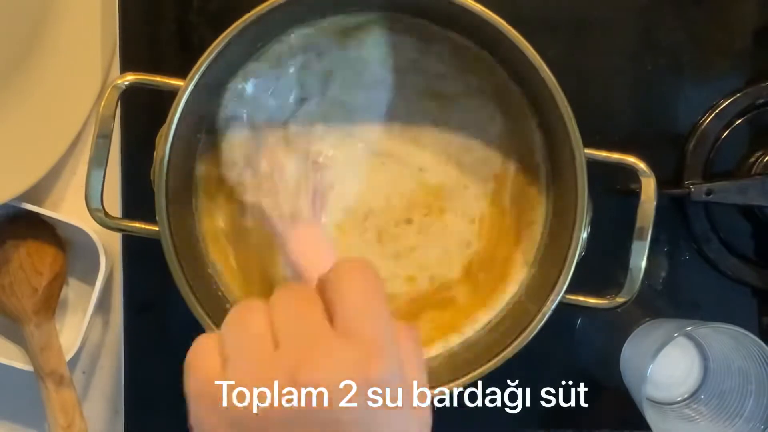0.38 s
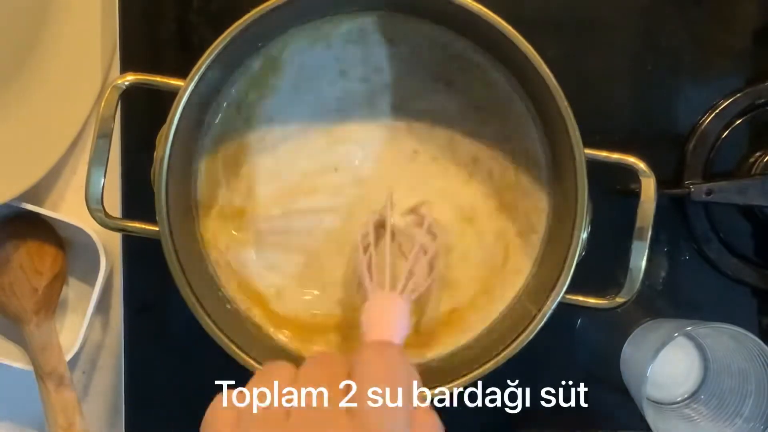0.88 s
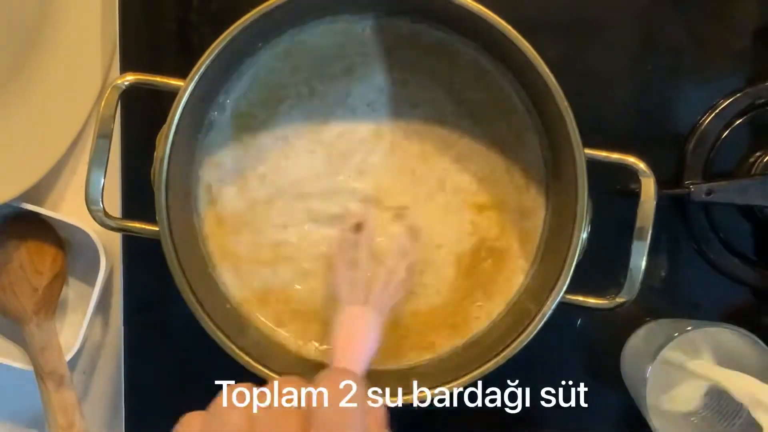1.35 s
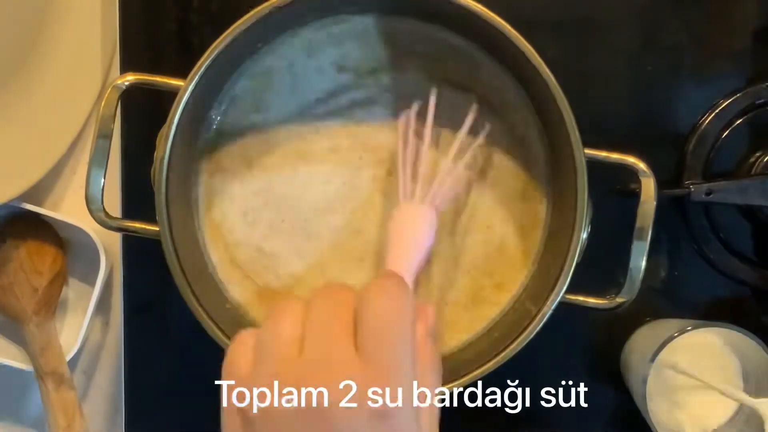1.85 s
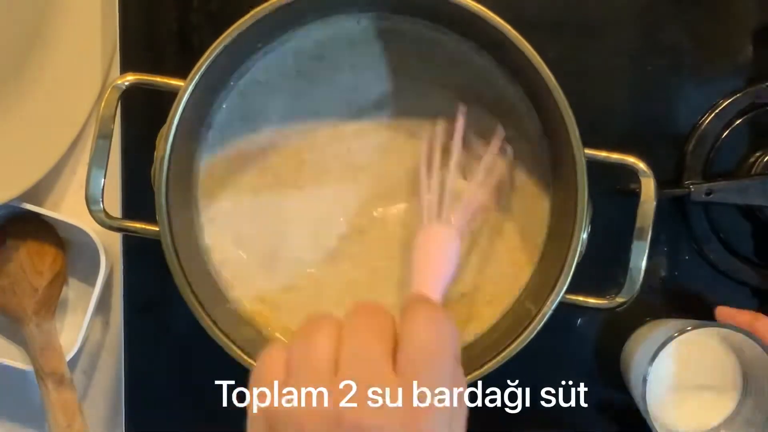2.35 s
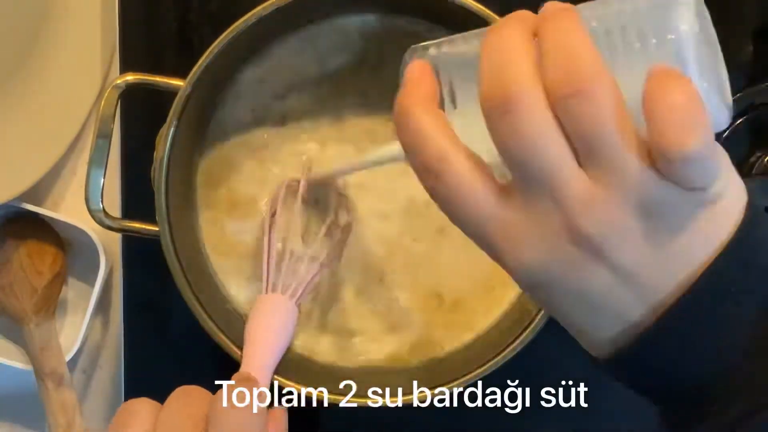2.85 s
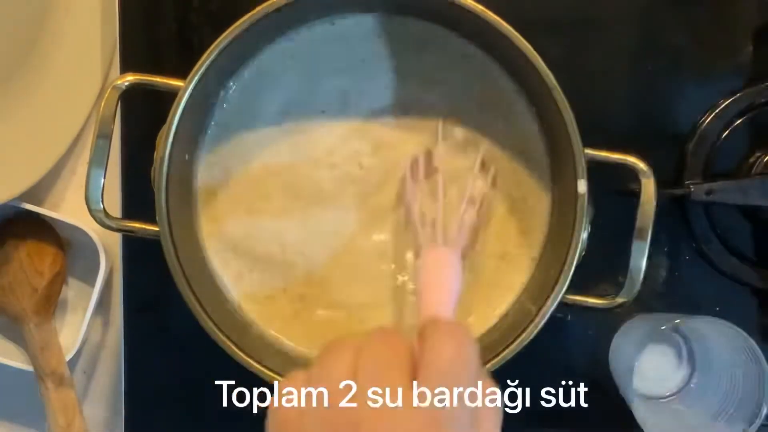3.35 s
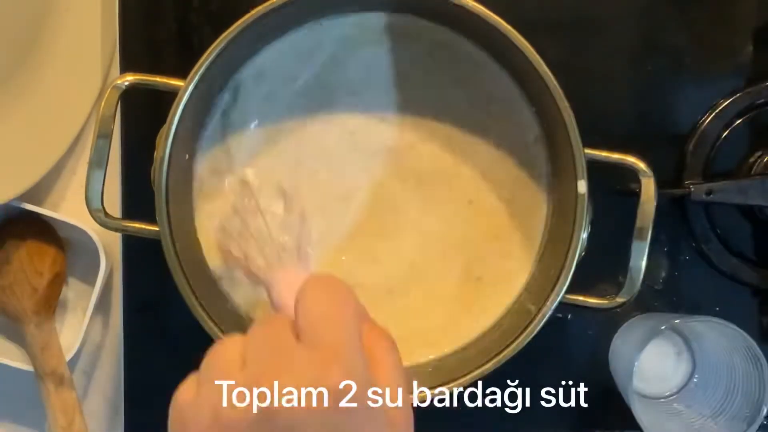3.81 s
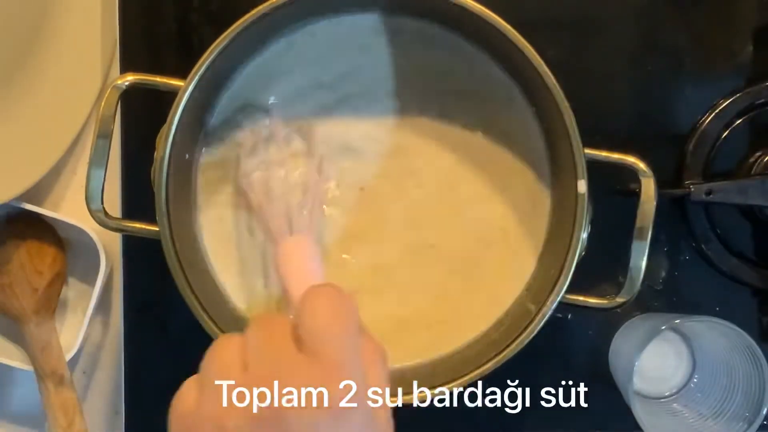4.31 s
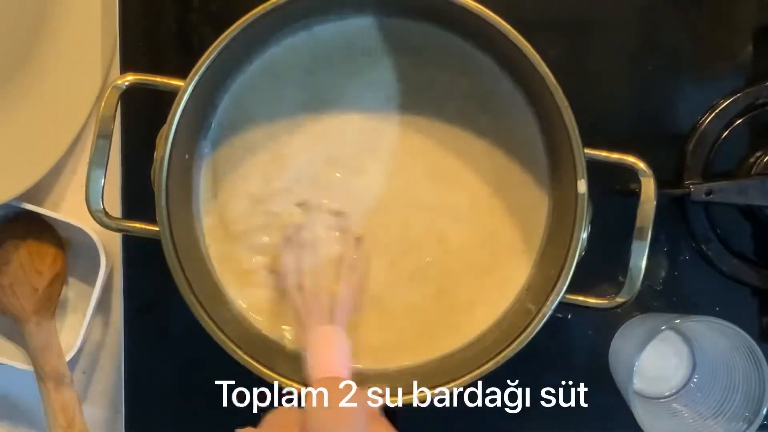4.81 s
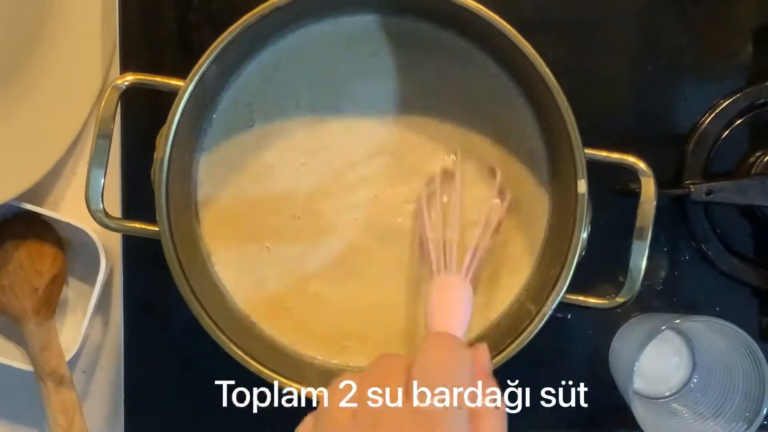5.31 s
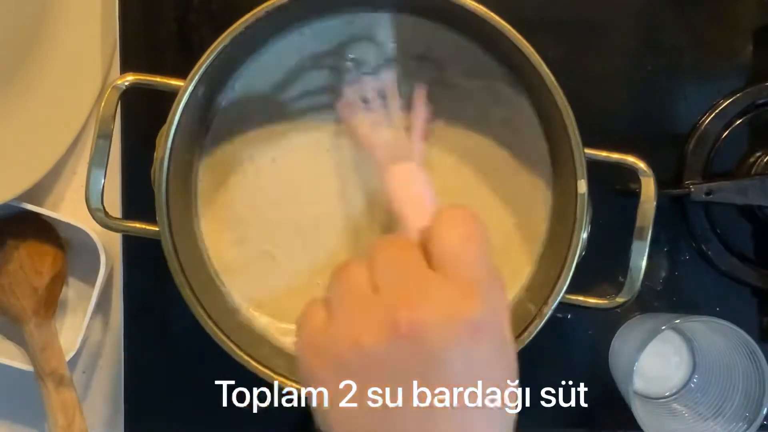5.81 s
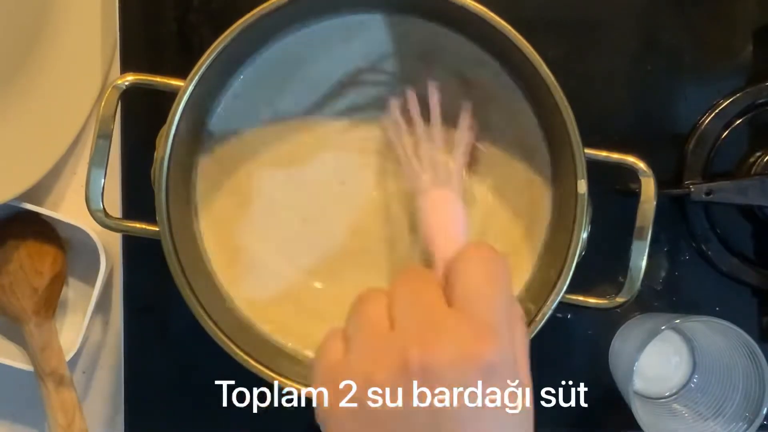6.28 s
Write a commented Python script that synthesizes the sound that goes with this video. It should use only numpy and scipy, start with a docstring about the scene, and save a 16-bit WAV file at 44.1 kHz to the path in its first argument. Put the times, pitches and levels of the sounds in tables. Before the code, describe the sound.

Steady broadband hiss and a mid-pitched fan whine fill the background throughout. In front, wet sauce glugs and plops irregularly as whisk wires brush and tick against steel. Two short bright trickles of milk come before midway; a hard glass click follows the second. Later the pot rings lightly under a few taps and the slosh swells. Close stereo pickup from just above the pot, with little room echo.

```python
"""Throughout, a gas flame hisses (shaped noise) and an extractor fan whines (harmonics of its blade rate),
while stirred sauce plops (damped bubbles) and sloshes (resonant noise) in a steel pot. From the start,
wires rub and knock on steel (noise bursts through modes). Milk trickles (tiny bubbles) at 1.4 s and 2.7 s,
a glass is set down at 3.2 s and taps ring the pot wall from 5.4 s (decaying partials), as the slosh
grows again. Two microphone ports hear it all from just above."""
import sys
import numpy as np
from scipy import signal
from scipy.fft import rfft, irfft, next_fast_len
from scipy.io import wavfile
from scipy.ndimage import uniform_filter1d, map_coordinates

SR = 44100
rng = np.random.default_rng(int(sys.argv[2]) if len(sys.argv) > 2 else 0)


def invert_db(level):
    """Linear amplitude ratio for a level in decibels (20 dB per decade), elementwise."""
    return 10 ** (np.asarray(level, dtype=float) / 20)


def wrap_up_sound(samples):
    """Save the sound to the file named by the first command line argument, as 16-bit audio."""
    columns = np.atleast_2d(samples).T
    # keep every value between -1 and 1, then stretch to whole-number steps
    tamed = np.clip(columns, -1, 1)
    steps = np.round(tamed * 32767).astype(np.int16)
    wavfile.write(sys.argv[1], SR, steps)


N = 283024

# the two ports: f/Hz, left lead/rad, left minus right/dB, likeness of diffuse sound (0-1)
PORT_PAIR = [(100, 0, 0, .985), (200, 0, 0, .9995), (300, .01, .1, .999), (600, .06, 1, .99),
             (1050, .3, 4.5, .9), (1400, .1, 1, .65), (1750, 0, -6, .2), (2100, 1.3, -1, .5),
             (2750, 1.6, -4, .55), (3800, 2.8, -5, .6), (4500, 2.3, -5, .55), (6000, 3.4, -7, .15),
             (6700, 4, -7, .5), (7200, 3.5, -7, .15), (7900, 6.1, -10, .4), (9200, 6.5, -6, .8),
             (11000, 7.7, -2.5, .6), (12400, 9, 0, .8), (16000, 9.6, 1, .75)]


def unit(x):
    """Normalisation: scaled to rms 1."""
    return x / np.sqrt(np.mean(x ** 2) + 1e-20)


def along(points, hz, column=1):
    """Interpolation: one column of a frequency table, read on a log axis."""
    table = np.array(points, float)
    return np.interp(np.log(hz + 1), np.log(table[:, 0] + 1), table[:, column])


def wobble(rate):
    """Band-limited fluctuation: a smooth random curve, rate knots a second."""
    return map_coordinates(rng.standard_normal(int(N * rate / SR) + 4), [np.arange(N) * rate / SR])


def filtered(x, response):
    """Linear filtering: the spectrum of x times a complex response of frequency."""
    m = next_fast_len(x.shape[-1] + 8192)
    return irfft(rfft(x, m) * response(np.fft.rfftfreq(m, 1 / SR)), m)[..., :x.shape[-1]]


def bump(f, hz, octaves):
    """Band weighting: a Gaussian on an octave axis, down to 1/e at octaves from its centre."""
    return np.exp(-(np.log2(f / hz + 1e-9) / octaves) ** 2)


def modes(table, f):
    """Modal superposition: causal response of damped resonators of alternating sign."""
    total = 0
    for k, (centre, width, db) in enumerate(table):
        damping = 1j * f * width
        total = total + (-1) ** k * invert_db(db) * damping / (centre * centre - f * f + damping)
    return total


def spread(pair, directness):
    """Spatial coherence: two unrelated signals mixed to the ports' likeness; near sounds are more alike."""
    def turn(hz):
        likeness = np.clip(along(PORT_PAIR, hz, column=3), .01, 1)
        return np.arccos(likeness ** np.clip(1 - directness, 0, 1)) / 2

    mid, side = filtered(pair, lambda hz: np.array([np.cos(turn(hz)), np.sin(turn(hz))]))
    return np.array([mid + side, mid - side])


def air():
    """Turbulence noise of flame and fan: hiss with soft patches, lifted at resonances of hood and pot."""
    # flame hiss and fan air: f/Hz, relative spectral level/dB per Hz
    hiss_spectrum = [(30, -39), (100, -24), (200, -5), (330, -1.5), (620, -11.5), (850, -24), (1400, -11),
                     (2500, -14.5), (4500, -17.5), (6100, -21), (7100, -13.5), (8700, -18), (9400, -18),
                     (12000, -24), (16000, -42)]
    # resonances of hood and pot: f/Hz, width/Hz, added power/dB
    hood_resonances = [(595.4, 17.3, 14.5), (682.8, 5, 22), (986, 110, 11), (1187, 115, 5.5), (1505, 13, 7),
                       (2126, 40, 9.5), (3033, 20, 9.5), (3534, 71, 8), (3950, 45, 4), (5000, 86, 5.5),
                       (7030, 42, 6.5), (7620, 110, 5.5), (8070, 110, -1), (9200, 120, 6), (9920, 76, -1)]

    def colour(hz):
        power = 1
        for centre, width, db in hood_resonances:
            power = power + invert_db(2 * db) / (1 + (2 * (hz - centre) / width) ** 2)
        return invert_db(along(hiss_spectrum, hz)) * np.sqrt(power)

    z = signal.stft(rng.standard_normal((2, N + 512)), nperseg=512)[2]
    field = uniform_filter1d(rng.standard_normal(z.shape[1:]), size=6, axis=0)
    field = uniform_filter1d(field, size=12, axis=1)
    patchy = z * invert_db(1.55 * unit(field))
    pair = signal.istft(patchy, nperseg=512)[1][:, :N]
    hiss = unit(spread(filtered(pair, colour), directness=0))
    return invert_db(-53 + 0.048 * wobble(3.42)) * hiss


def fan():
    """Blade-passing tones: harmonics of a slightly drifting shaft speed, each wavering in level."""
    # fan whine: order of the blade rate, rms level/dB before wavering
    whine = [(1, -60), (2, -62.5), (3, -65.5)]
    blade_hz = 550.5
    phase = 2 * np.pi * np.cumsum(blade_hz * (1 + 0.001495 * wobble(9))) / SR
    out = np.zeros(N)
    for order, db in whine:
        level = np.sqrt(2) * invert_db(db + 2.05 * wobble(25) + 1.67 * wobble(4.07))
        out += level * np.sin(order * phase + 2 * np.pi * rng.random())
    return out


def blips(rows, damping, rough):
    """Bubble oscillation: short decays whose phase wanders, smearing each note; two unrelated draws."""
    out, t = np.zeros((2, N + SR)), np.arange(SR // 30) / SR
    for s, db, hz, ms in rows:
        steps = rng.standard_normal((2, len(t)))
        drift = rough * np.sqrt(hz / SR / ms) * np.cumsum(steps, axis=1)
        note = np.sin(2 * np.pi * (hz * t + rng.random((2, 1))) + drift)
        swell = (1 - np.exp(-t / 0.00031)) * np.exp(-damping * 1000 * t / ms)
        out[:, round(s * SR):][:, :len(t)] += invert_db(db) * swell * note
    return out[:, :N]


def milk():
    """Entrained-bubble sound: droplets, a fizz of tiny bubbles while milk runs, and a faint flutter."""
    # louder droplets and small bubbles: t/s, relative level/dB, f/Hz
    droplets = [(0.47, -52, 2900), (0.812, -50, 2855), (1.223, -47, 8700), (1.378, -44, 5250),
                (1.398, -49.5, 10000), (1.349, -54, 11800), (1.416, -53, 12900), (1.425, -57, 10600),
                (1.428, -56, 7900), (1.481, -50, 8060), (1.486, -46, 14200), (1.492, -55, 10160),
                (1.539, -48, 5350), (1.58, -48, 14000), (1.59, -50, 10800), (1.592, -50, 7460),
                (1.584, -51, 3350), (1.628, -45.5, 9900), (1.645, -48, 3000), (1.691, -48, 7950),
                (1.691, -45, 2500), (1.698, -44, 2200), (1.697, -50, 7000), (1.726, -52, 10200),
                (1.759, -47, 8850), (1.766, -50, 13500), (1.773, -53, 8000), (1.79, -51, 10000),
                (1.79, -52, 7980), (1.807, -51, 7600), (1.806, -53.5, 2900), (1.841, -50, 10000),
                (2.27, -49, 3510), (2.705, -42, 8700), (2.706, -48, 3230), (2.714, -46, 10950),
                (2.737, -44, 10800), (2.736, -42, 8300), (2.743, -49, 14300), (2.743, -50, 11000),
                (2.744, -54, 4900), (2.765, -51, 11300), (2.769, -48, 13400), (2.788, -53, 7670),
                (2.816, -52, 11900), (2.838, -48, 3300), (2.853, -54, 11000), (2.866, -53, 7750),
                (2.892, -47.5, 4800), (2.893, -48, 3400), (2.901, -47, 12000), (2.901, -45, 14400),
                (3.76, -47, 12500), (6.174, -50, 10700)]
    # milk running, first into the glass, then into the pot: start t/s, end t/s, relative fizz level/dB
    pours = [(1.38, 1.869, -57.5), (2.7, 2.93, -56.5)]
    rise_db_per_s, fall_db_per_s = 250, 500

    when, size, pitch, life = rng.random((4000, 4)).T
    s = when * N / SR
    flows = []
    for start, end, db in pours:
        before, after = np.clip(start - s, 0, None), np.clip(s - end, 0, None)
        flows.append(db - rise_db_per_s * before - fall_db_per_s * after)
    level = np.max(flows, axis=0) - 3.7 * np.log(size + .02)
    tiny = np.transpose([s, level, 2300 * 6 ** pitch, 0.64 + 2.5 * life])[level > -95]
    fizz = blips(tiny, damping=1.54, rough=1.2)

    # life scale is 8.2 ms at 3 kHz, shorter at higher pitch
    rows = [(at, db, hz, 8.2 * (3000 / hz) ** 0.8) for at, db, hz in droplets]
    drops = invert_db(4) * blips(rows, damping=1.1, rough=.8)

    when, size, pitch = rng.random((70, 3)).T
    flutter_db = -57.5 - 3.0 * np.log(size + .05)
    faint = np.transpose([when * N / SR, flutter_db, 3000 * 1.25 ** (pitch - .3), np.full(70, 9.0)])
    flutter = blips(faint, damping=1.3, rough=0.99)
    return spread(drops + fizz + flutter, directness=0.3)


def rubs():
    """Friction and splash noise: short swells of grainy noise, each confined to one band."""
    # wires rubbing the pot and milk splashing: start t/s, length/s, level/dB, centre f/Hz, spread/octaves
    strokes = [(0.025, 0.087, -62, 2900, 0.088), (.13, 0.087, -60, 2900, .1),
               (0.254, 0.024, -50, 2000, 1.3), (.375, 0.037, -58, 2950, .06), (.61, 0.043, -62, 2900, 0.07),
               (.808, .03, -50, 2830, 0.063), (0.838, 0.037, -47, 1140, 0.49), (0.849, .03, -45, 580, 0.41),
               (0.837, .035, -55, 2640, 0.67), (.85, .013, -55, 4700, .06), (0.862, 0.017, -47, 4900, .08),
               (0.872, 0.017, -53, 5200, .07), (0.929, .022, -51, 1050, .5),
               (1.006, 0.0088, -51, 1000, 0.71), (1.465, .006, -54, 4800, .4), (1.476, .03, -56, 8500, 1),
               (1.696, 0.0074, -56, 8500, .4), (1.77, .012, -60, 8500, .3),
               (1.837, 0.0076, -52.5, 3000, .4), (1.536, .032, -52, 5300, 0.32),
               (1.625, .014, -61, 12500, .2), (1.58, .025, -54, 3000, 0.33), (1.638, .025, -53, 2900, 0.3),
               (2.148, 0.016, -48.5, 1200, .7), (2.395, 0.018, -49.5, 1400, 0.42),
               (2.702, 0.038, -53.5, 3050, .12), (2.822, 0.044, -60, 3300, 0.14),
               (2.7, .125, -62, 13500, .4), (2.8, .125, -63, 13000, .4)]
    out = np.zeros((2, N + SR))
    grain = invert_db(3 * wobble(450))  # roughness in dB
    for s, length, db, hz, octaves in strokes:
        u = np.arange(SR // 8) / SR / length
        noise = rng.standard_normal((2, len(u))) * grain[round(s * SR):][:len(u)]
        band = filtered(noise, lambda f: bump(f, hz, octaves))
        band = band / np.sqrt(np.mean(band[:, u < 1] ** 2))
        swell = np.sin(np.pi * np.clip(u, 0, 1) ** 0.82) ** 0.65 * (u < 1)
        out[:, round(s * SR):][:, :len(u)] += invert_db(db) * band * swell
    return spread(out[:, :N], directness=0.24)


def ringing(blows, notes, rise_s):
    """Free vibration: each blow starts every partial afresh, and each dies at its own speed."""
    out, t = np.zeros(N + SR), np.arange(SR // 3) / SR
    for s, db in blows:
        ring = np.zeros(len(t))
        for k, (hz, level, t60) in enumerate(notes):
            ring += invert_db(level - 60 * t / t60) * np.sin(2 * np.pi * hz * t) * (-1) ** k
        out[round(s * SR):][:len(t)] += invert_db(db) * ring * (1 - np.exp(-t / rise_s))
    return out[:N]


def glass_set_down():
    """Impulse response of a glass set down on the hob: quickly damped partials."""
    # the blow: t/s, level/dB
    blow = [(3.2198, -27)]
    # partials: f/Hz, level relative to the blow/dB, t60/s
    glass_notes = [(1240, -1, 0.061), (1460, 0.5, 0.049), (2160, -6.5, 0.036), (2345, -4, .03),
                   (2730, -11, .03), (3300, -10, .04), (3950, -7, 0.056), (5000, -1, .035), (5766, -3, .04),
                   (7284, -6, 0.027), (8870, 4, 0.024), (9600, 10, 0.023), (11300, 2, .03),
                   (13000, -11, .02)]
    return ringing(blow, glass_notes, rise_s=0.00046)


def wall_taps():
    """Lightly damped vibration of the pot wall: taps leave a few low partials ringing."""
    # the taps: t/s, level/dB
    tap_times = [(5.384, -43), (5.408, -48), (5.48, -50), (5.714, -56)]
    # partials: f/Hz, level relative to the tap/dB, t60/s
    wall_notes = [(993, -1.5, 0.16), (1240, -2, 0.18), (1465, -8, 0.13)]
    return ringing(tap_times, wall_notes, rise_s=0.0033)


def knocks():
    """Impact excitation: a first touch and a rattle drive steel modes; with a weak bright ring, it is sharper."""
    # knocks on pot and hob: t/s, low ring level/dB, its centre f/Hz, middle ring level/dB,
    # its centre f/Hz, bright ring level/dB
    contacts = [(0.088, -49.5, 990, -58, 3000, -60), (0.262, -48.5, 1120, -50.5, 3000, -60),
                (0.934, -48.5, 1000, -55.5, 3300, -69), (1.004, -49.5, 1050, -60, 2600, -74),
                (1.223, -51, 1350, -55, 3300, -59), (1.585, -52, 1260, -56, 3200, -58),
                (1.691, -51, 1260, -61, 2500, -59), (1.946, -46.5, 1290, -46.5, 3000, -42),
                (1.956, -49, 1000, -48, 3130, -52), (2.156, -45, 1110, -55, 2800, -77),
                (2.204, -52, 1050, -57, 2500, -74), (2.404, -47, 1330, -55.5, 3300, -59),
                (2.6054, -44, 950, -39, 3600, -37), (2.619, -51, 1160, -56, 3600, -60),
                (3.218, -65, 1280, -46, 2900, -44), (3.2191, -41, 1270, -35.5, 2830, -25),
                (3.2231, -44, 1280, -36, 4970, -49), (3.272, -53, 1400, -57, 2400, -64),
                (3.789, -50.5, 1100, -51.5, 2800, -59), (5.219, -53, 1160, -66, 2800, -79),
                (5.28, -54, 1110, -73, 3000, -58.5), (5.3822, -46.5, 1070, -50, 3000, -39),
                (5.3866, -53, 1000, -50, 3000, -44), (5.557, -55, 1050, -70, 3000, -57),
                (5.598, -54, 1270, -62, 3000, -54.5), (5.714, -54, 1180, -55, 2800, -72),
                (6.033, -49, 1230, -55, 2600, -68)]
    # modes of the steel: f/Hz, width/Hz, level/dB
    steel_modes = [(995, 56, -3), (1252, 45, 1.5), (1467, 54, -1.5), (2150, 90, 2), (2900, 120, -12.5),
                   (3350, 57, 1.5), (4110, 120, -7.5), (4970, 100, 2), (5770, 110, -5), (7450, 200, -1),
                   (8000, 250, -2.5), (8300, 200, 1), (8840, 69, 3.5), (9700, 320, 1), (10200, 200, -7),
                   (11300, 570, -9), (13000, 660, -10.5), (15000, 900, -4)]
    body_hz, body_db = 590, -8  # dull thud under each knock, level against its low ring

    out, t = np.zeros((2, N + SR)), np.arange(SR // 8) / SR
    touch = 1.9 * invert_db(-60 * t / 0.0057)
    for s, low_db, low_hz, middle_db, middle_hz, bright_db in contacts:
        sharp = 1 / (3 + np.exp(bright_db + 54))  # near 1/3 for a weak bright ring, near 0 for a strong one
        ms = 29 + 8 * sharp  # basic t60 of the rattle
        rise = 1 - np.exp(-1000 * t / (0.96 * (1 - sharp) + .02))
        noise = rng.standard_normal((2, len(t))) * rise
        # level/dB, centre f/Hz, spread/octaves, factor on t60, echo level/dB, unresonant part/dB
        bands = ((low_db, low_hz, .45, 1.3, -20, -9),
                 (middle_db, middle_hz, .52, 1.2, -20, -6),
                 (bright_db, 9700, .62, .75, -28, -9),
                 (low_db + body_db, body_hz, .3, 1.6, -15, 0.1))
        for level_db, hz, octaves, lasting, echo_db, dull_db in bands:
            rattle = invert_db(-60000 * t / (ms * lasting))
            kitchen_echo = invert_db(echo_db - 60 * t / 0.1)
            contact = noise * (sharp * touch + rattle + kitchen_echo)
            # big panels start slowly: the lower the band, the longer
            contact = contact * (1 - np.exp(-1000 * t / (1.3 * (body_hz / hz) + .02)))
            ring = filtered(contact, lambda f: bump(f, hz, octaves) * (modes(steel_modes, f) + invert_db(dull_db)))
            ring = ring / np.sqrt(np.mean(ring[:, :SR // 100] ** 2))  # rms of the first 10 ms
            out[:, round(s * SR):][:, :len(t)] += invert_db(level_db) * ring
    return spread(out[:, :N], directness=0.61)


def plop(hz, t, cycles, sag):
    """Heavily damped bubble: a cycle or two in a smooth swell centred on t = 0, the pitch sagging."""
    u = t * hz / cycles
    bent = t * (1 - sag * np.tanh(u))
    return np.exp(-u ** 2) * np.sin(2 * np.pi * hz * bent + 2 * np.pi * rng.random())


def sauce():
    """Bubble bursts and cavity resonance: plops, a patter of small ones, and two slosh notes surging with them."""
    # louder bubbles bursting behind the wires: t/s of the swell's centre, relative level/dB, f/Hz
    bursts = [(0.196, -37, 374), (0.286, -36.5, 425), (0.359, -38.5, 402), (0.391, -31.5, 472),
              (0.483, -33.5, 365), (0.51, -42, 380), (0.587, -39.5, 420), (0.64, -40, 397),
              (0.744, -40, 380), (0.761, -39, 410), (0.711, -42, 400), (0.869, -37.5, 580),
              (0.916, -39.5, 450), (0.994, -39.5, 514), (1.022, -42, 500), (1.125, -40.5, 444),
              (1.49, -42, 414), (1.163, -34.5, 400), (1.209, -34.5, 388), (1.363, -41, 408),
              (1.573, -35.5, 387), (1.907, -35.5, 362), (2.065, -39, 476), (2.073, -34.5, 396),
              (2.095, -40, 360), (2.17, -38.5, 556), (2.21, -37.5, 560), (2.533, -37.5, 500),
              (2.56, -28, 460), (2.573, -30, 395), (2.92, -37.5, 400), (3.005, -41, 418), (3.1, -39, 380),
              (3.323, -37.5, 348), (3.415, -39.5, 327), (3.48, -40.5, 400), (3.861, -32.5, 438),
              (3.95, -40, 393), (4.245, -38.5, 466), (4.272, -37.5, 413), (4.559, -37, 435),
              (4.65, -37.5, 340), (4.699, -32, 420), (4.754, -37.5, 439), (5.025, -31, 452),
              (5.038, -30.5, 398), (5.223, -42, 464), (5.285, -38, 473), (5.368, -34.5, 420),
              (5.411, -37, 520), (5.545, -33, 450), (5.68, -36.5, 420), (5.766, -33.5, 375),
              (5.885, -37, 381), (5.902, -41, 350), (6.04, -38.5, 427), (6.062, -32.5, 428),
              (5.95, -47, 350), (6.09, -41, 360), (6.111, -44, 420), (6.152, -40, 400), (6.272, -35, 380),
              (6.32, -41, 350), (6.348, -40, 467), (6.374, -33, 280)]
    # sauce dragged round the pot: t/s, low slosh note level/dB, high slosh note level/dB
    slosh_levels = [(0, -60, -63), (.4, -63, -72), (.68, -55, -71), (.76, -52, -65), (.85, -57, -71),
                    (1.7, -65.5, -73), (2.25, -57.5, -74), (2.8, -66.5, -82), (3.35, -60.5, -76),
                    (3.7, -67, -83), (3.8, -51, -72), (3.9, -57, -74), (4.1, -56.5, -88), (4.4, -60.5, -76),
                    (5.1, -56, -69), (5.26, -49, -61), (5.45, -64, -68), (5.7, -68, -73), (5.8, -57, -50),
                    (5.89, -50, -54.5), (6, -55, -52), (6.08, -56, -54), (6.19, -55, -48.5),
                    (6.28, -49.5, -57), (6.42, -53.5, -48)]
    # the two slosh notes: f/Hz, width/Hz
    slosh_notes = [(328, 69), (437, 50)]
    surge_s, surge_db, surge_note_db = 0.012, -25, (5, -5.5)  # length, level against the plop, per note
    patter_db, patter_follows = -57, 0.55  # relative level, and dB gained per dB of slosh
    small_hz = 105  # plops and patter fade out below this

    half = SR // 100
    t, clock = np.arange(-half, half) / SR, np.arange(N) / SR
    loud, small = np.zeros(N + 2 * half), np.zeros(N + 2 * half)
    surge = np.zeros(N)
    for s, db, hz in bursts:
        loud[round(s * SR):][:2 * half] += invert_db(db) * plop(hz, t, cycles=0.77, sag=0.33)
        surge += invert_db(db + surge_db) * np.exp(-((clock - s) / surge_s) ** 2)
    for when, size, pitch in rng.random((420, 3)):
        bubble = plop(270 * 2.1 ** pitch, t, cycles=1.04, sag=0.38)
        small[int(when * N):][:2 * half] += invert_db(-3.5 * np.log(size + 0.017)) * bubble

    s, *levels = np.transpose(slosh_levels)
    stirring_db = np.interp(clock, s, np.mean(levels, axis=0) - np.mean(levels))
    patter = invert_db(patter_db + patter_follows * stirring_db) * unit(small[half:N + half])
    plops = loud[half:N + half] + patter
    out = invert_db(0.5) * filtered(plops, lambda f: f ** 4 / (f ** 4 + small_hz ** 4))

    for db, note_db, (hz, width) in zip(levels, surge_note_db, slosh_notes):
        lumps = invert_db(1.7 * wobble(40)) * rng.standard_normal(N)
        level = invert_db(np.interp(clock, s, db) + 1.5 * wobble(9)) + invert_db(note_db) * surge
        out += level * unit(filtered(lumps, lambda f: modes([(hz, width, 0)], f) ** 2))
    return out


def scene():
    """Superposition: all sources added, ahead of the ports' own differences."""
    rings = glass_set_down() + wall_taps()
    return air() + fan() + sauce() + milk() + knocks() + rings + rubs()


def band_limit(x):
    """A steep low-pass at the top of the band."""
    return signal.sosfilt(signal.butter(12, 16550, fs=SR, output="sos"), x)


def record(dry):
    """Two-port reception: phase and level differ with frequency; bass rolls off to the electronics' rumble."""
    def half(hz):
        """Half of the difference between ports, given to the left; the right gets its inverse."""
        return invert_db(along(PORT_PAIR, hz, column=2) / 2) * np.exp(1j * along(PORT_PAIR, hz) / 2)

    def low_cut(hz):
        """Three cascaded first-order high-passes."""
        return (1j * hz / (1j * hz + 170)) ** 3

    wet = filtered(dry, lambda hz: low_cut(hz) * np.array([half(hz), 1 / half(hz)]))
    noise = rng.standard_normal(N) + .2 * rng.standard_normal((2, N))  # mostly common to both ports
    rumble = unit(filtered(noise, lambda hz: 1 / (1 + (hz / 90) ** 2)))
    mix = wet + invert_db(-100 + 3.41 * wobble(6)) * rumble
    return band_limit(mix)


dry = scene()
out = record(dry)
wrap_up_sound(out)
```